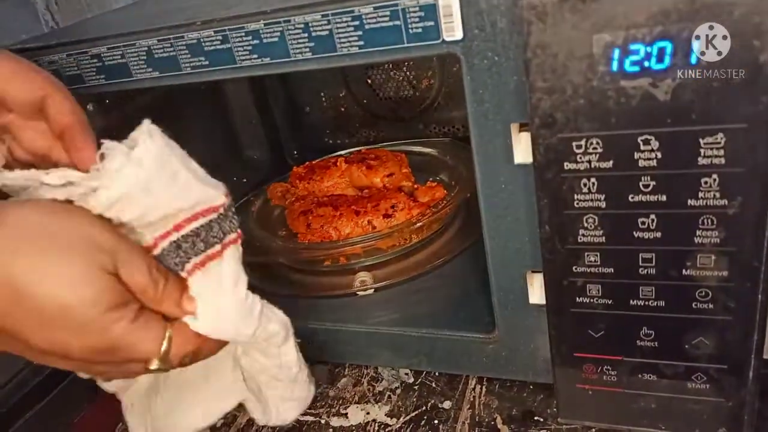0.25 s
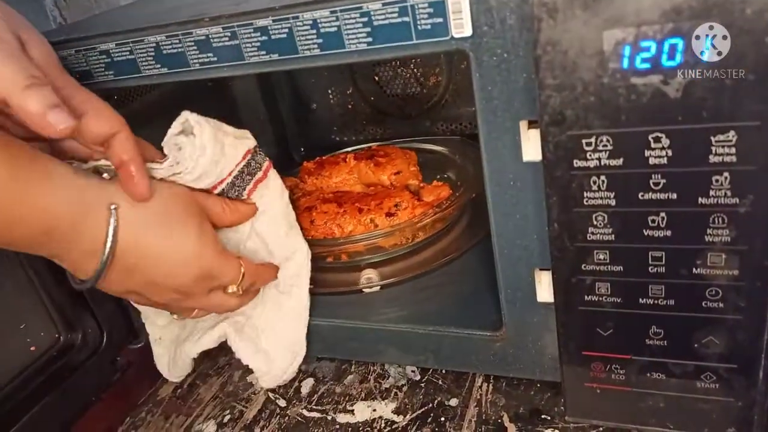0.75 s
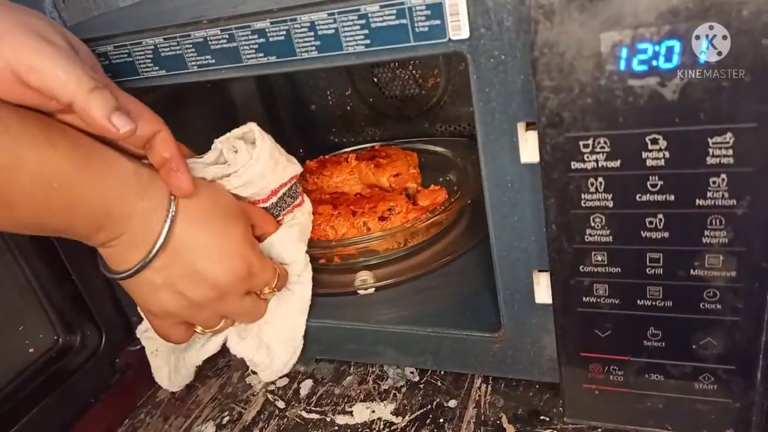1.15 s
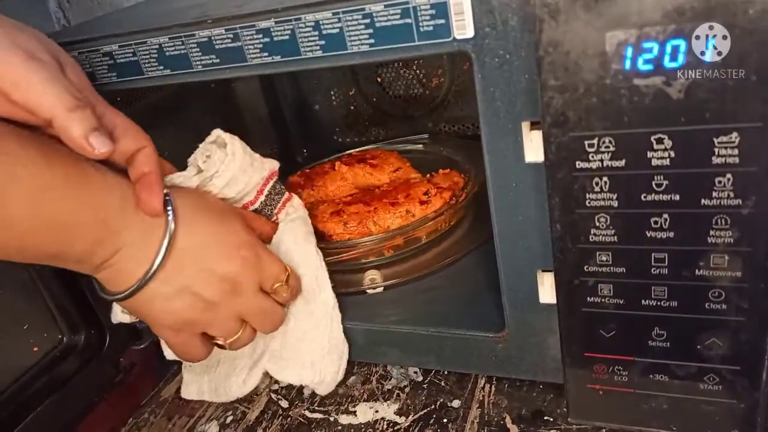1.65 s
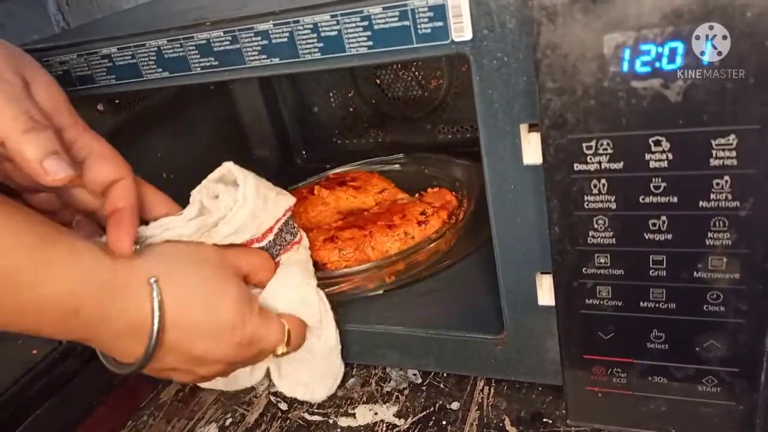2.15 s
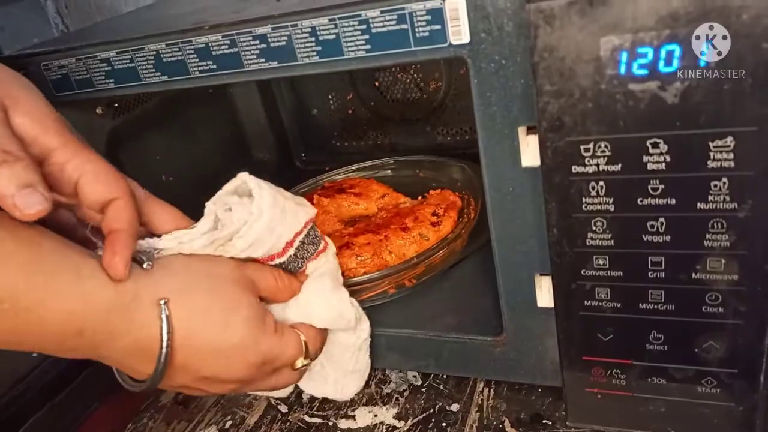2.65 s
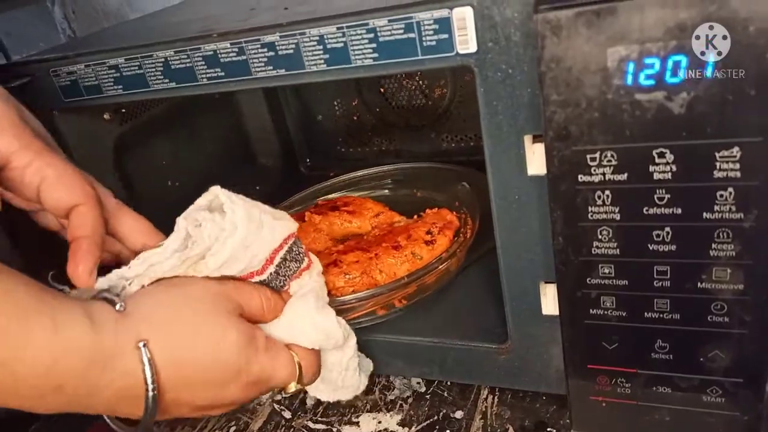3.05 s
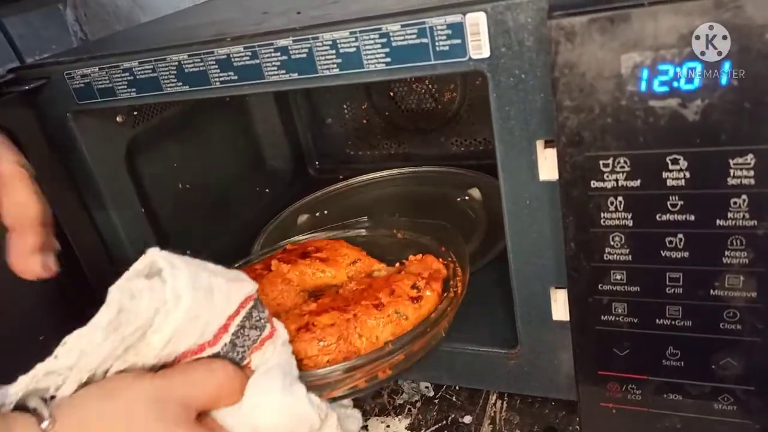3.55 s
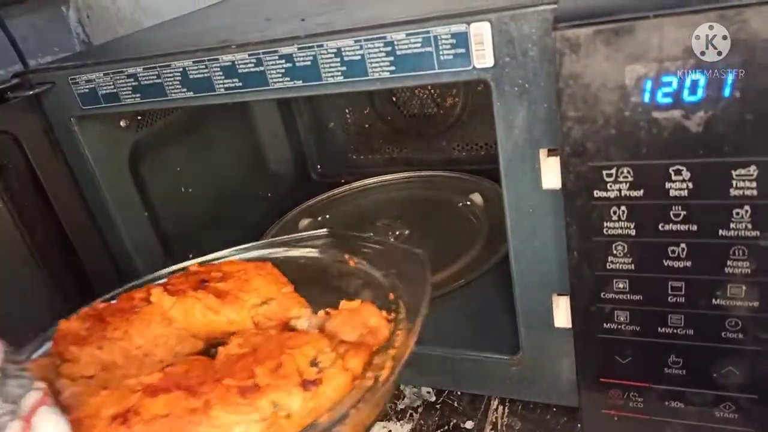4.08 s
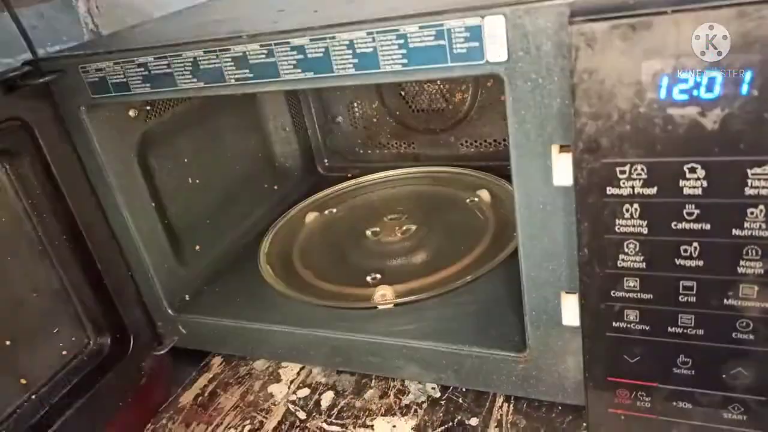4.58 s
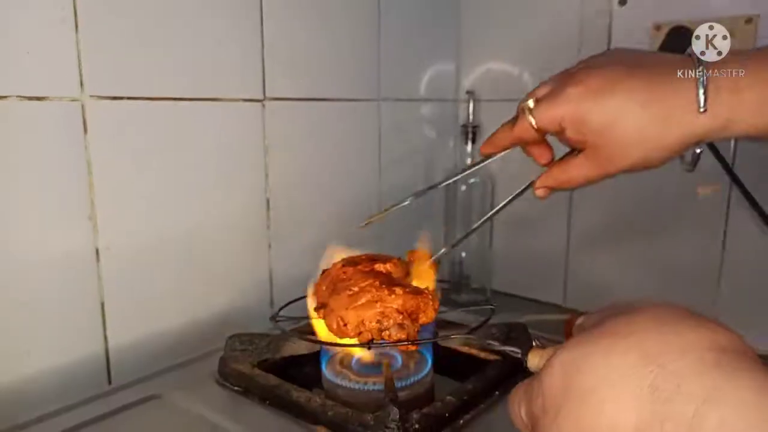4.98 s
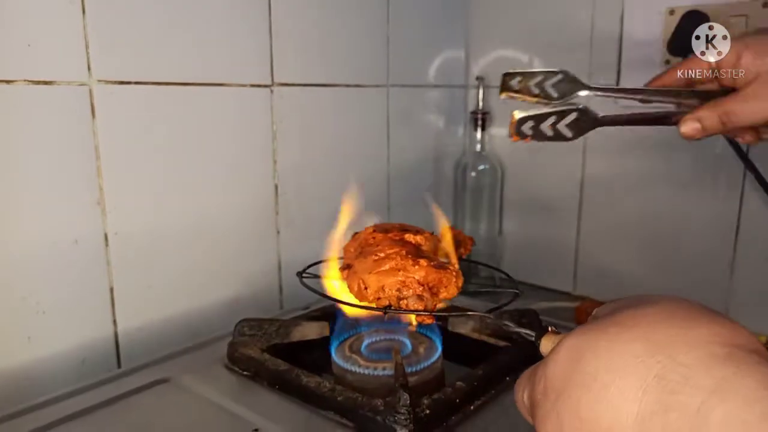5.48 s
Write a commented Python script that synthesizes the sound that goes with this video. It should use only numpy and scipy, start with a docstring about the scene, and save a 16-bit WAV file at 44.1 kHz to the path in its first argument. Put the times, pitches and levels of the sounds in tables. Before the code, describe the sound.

Over a low kitchen hum, a brief squeak and soft towel rubbing lead into dull knocks as a glass dish is worked out of a microwave oven. It drags with a rough ringing tone, clinks hard once, then taps lightly over the turntable. After a tiny squeak the sound fades, and a gas flame comes in, roaring softly while meat sizzles and spits. Everything is close, in stereo.

```python
"""A squeak over the hum of a small kitchen: close by, a glass baking dish is being worked out of a
microwave oven with a towel. It rubs, knocks in the steel cavity, drags until the glass sings, clinks
hard once and taps over the turntable. After a last short squeak the oven fades out, and we fade in at a
gas burner, where the flame roars and meat sizzles and spits. One stereo microphone hears it all."""
import sys
import numpy as np
from scipy import signal
from scipy.fft import rfft, irfft
from scipy.io import wavfile

SR = 44100
rng = np.random.default_rng(int(sys.argv[2]) if len(sys.argv) > 2 else 0)


def store_pcm(level_fs):
    """Save levels as 16-bit WAV."""
    pcm = np.round(np.clip(level_fs, -1, 1) * 32767).astype(np.int16)
    wavfile.write(sys.argv[1], SR, np.atleast_2d(pcm).T)


N = 252296
TIME = np.arange(N) / SR
RING = np.arange(SR // 2) / SR  # seconds since a blow

# Modes of the glass dish and of the steel cavity. Each row: frequency in Hz, level in dB, t60 in seconds.
DISH_MODES = [(792, -1.5, 0.19), (1040, -2.5, 0.2), (1145, 2.5, 0.1), (1735, -1, 0.2), (1787, 9, 0.053),
              (2220, -9, 0.19), (2617, -4.5, 0.1), (3540, -5.5, 0.096), (4100, -8.5, 0.085),
              (4700, -8.5, 0.12), (6300, -9.5, 0.15)]
OVEN_MODES = [(219, -8, 0.31), (253.6, 0.5, 0.23), (333, -13.5, 0.42), (487, -6, 0.24), (568, 2.5, 0.13),
              (621.5, 5, 0.14)]
# Colours of a soft blow and of sizzling fat. Each row: frequency in Hz, relative density in dB.
SOFT_BLOW_SPECTRUM = [(80, -19.5), (240, 1), (650, 2), (1300, -1.5), (2050, -4), (2900, -19), (4500, -17.5),
                      (5500, -27.5), (6600, -19), (8300, -29), (15000, -42.5)]
SIZZLE_SPECTRUM = [(700, 4), (2700, 2), (3200, 5), (4200, 5), (5000, -3), (5950, -3), (6250, 3.5),
                   (8400, 3.5), (12000, -4.5), (15500, 0)]
# The hard clink and its rebounds. Each row: start in seconds, level in dB.
CLINK_HITS = [(2.2734, -19), (2.2778, -14), (2.284, -23), (2.292, -28), (2.3032, -33.5)]


def amp(db):
    """Decibels to gain."""
    return 10 ** (np.asarray(db) / 20)


def ramp(x):
    """Holds a slope between 0 and 1."""
    return np.clip(x, 0, 1)


def unit_rms(x):
    """Scales to rms 1."""
    return x / np.sqrt(np.mean(x ** 2) + 1e-20)


def unit_attack(x):
    """Scales a blow so that its first 30 ms have rms 1."""
    return x / np.sqrt(np.mean(x[:, :round(0.03 * SR)] ** 2) + 1e-20)


def curve_at(points, hz):
    """Interpolates a curve over log frequency."""
    point_hz, values = np.transpose(points)
    return np.interp(np.log(hz + 1), np.log(point_hz + 1), values)


def add(mix, start_s, sound):
    """Mixes a sound in at its start time."""
    part = mix[:, round(start_s * SR):][:, :sound.shape[1]]
    part += sound[:, :part.shape[1]]


def panned(x, left_db):
    """Sets the left channel left_db above the right."""
    return x * amp([[left_db / 2], [-left_db / 2]])


def band(x, lo_hz, hi_hz):
    """Causal band-pass."""
    sos = signal.butter(3, [lo_hz, min(hi_hz, SR / 2 - 1)], "band", fs=SR, output="sos")
    return signal.sosfilt(sos, x)


def band_noise(lo_hz, hi_hz, shape=N):
    """Noise in one band, at rms 1."""
    return unit_rms(band(rng.standard_normal(shape), lo_hz, hi_hz))


def coloured(x, spectrum):
    """Colours two unrelated signals; the microphone's two ports hear the bass alike."""
    # Each row: frequency in Hz, left-right correlation.
    port_likeness = [(250, 0.9), (500, 0.6), (1000, 0.13), (2000, 0)]
    hz = np.fft.rfftfreq(x.shape[1], 1 / SR)
    correlation = curve_at(port_likeness, hz)
    mid, side = rfft(x) * np.sqrt([1 + correlation, 1 - correlation])
    left_right = np.array([mid + side, mid - side]) * amp(curve_at(spectrum, hz))
    return unit_rms(irfft(left_right, x.shape[1]))


def noise(spectrum, size=N):
    """Stereo noise of a given colour."""
    return coloured(rng.standard_normal((2, size)), spectrum)


def grains(spectrum, per_s, spread_db):
    """Coloured random clicks of uneven size, each heard at both ports."""
    sizes = amp(spread_db * np.minimum(rng.exponential(1, N), 4))
    fires = rng.random(N) < per_s / SR
    return coloured(sizes * fires * rng.standard_normal((2, N)), spectrum)


def ringing(modes, apart_hz=1300, place_db=2.2):
    """Dying modes, weighted by where the blow lands; high ones differ more in phase between the ports."""
    out = np.zeros((2, len(RING)))
    for hz, db, t60 in modes:
        port_phase = np.array([[1], [-1]]) * min(hz / apart_hz, 1) * np.pi / 4
        phase = 2 * np.pi * rng.random() + rng.choice([-1, 1]) * port_phase
        decay = amp(db + place_db * rng.standard_normal() - 60 * RING / t60)
        out += ramp(RING * hz) * decay * np.sin(2 * np.pi * hz * RING + phase)
    return unit_attack(out)


def eased_in(blow, rise_s):
    """Rounds off the onset of a blow."""
    return blow * (1 - np.exp(-RING / rise_s))


def clatter(spectrum, t60, contact_s=0.00036):
    """Countless short overtones merging into a noisy crack."""
    onset = 1 - np.exp(-(RING / contact_s) ** 2)
    return unit_attack(noise(spectrum, len(RING)) * amp(-60 * RING / t60) * onset)


def contact(blow, thud_db, ring_db, tick_db):
    """Place and hardness of a contact set its thud (centre), ring (to the right) and tick (to the left)."""
    parts = [(thud_db, 130, 700, 0), (ring_db, 700, 2800, -4), (tick_db, 2800, 15000, 2)]
    return sum(amp(db) * unit_attack(panned(band(blow, lo_hz, hi_hz), left_db))
               for db, lo_hz, hi_hz, left_db in parts)


def kitchen(tone_db=-44.5, hum_hz=98, hum_db=-55, hiss_db=-60):
    """Room tone, a low appliance hum and the microphone's faintly wavering hiss."""
    # Each row of both: frequency in Hz, relative density in dB.
    tone_spectrum = [(25, -43.5), (64, -15), (85, -10), (132, -3), (401, -6.5), (1270, -17), (4550, -29),
                     (5370, -37.5), (6640, -31.5), (8400, -36.5), (10900, -61), (18500, -120)]
    hiss_spectrum = [(5800, -13.5), (6550, 5), (7100, -7), (7700, -2), (8600, -10.5), (15500, -14)]
    hum = amp(hum_db) * band_noise(hum_hz - 5, hum_hz + 5)
    waver_db = 0.7 * band_noise(0.6, 5)
    return amp(tone_db) * noise(tone_spectrum) + hum + amp(hiss_db + waver_db) * noise(hiss_spectrum)


def stick_slip(strokes, harmonics_db, edge_s, waver, waver_hz, hiss_db, sag=0, arch=0):
    """Regular stick and slip: hiss and fluttering harmonics whose pitch sags or arches over a stroke."""
    out = np.zeros((2, N))
    port_cycles = np.array([[0], [0.1]])
    wobble, *flutter_db = band_noise(waver_hz / 4, waver_hz, (len(harmonics_db) + 1, N))
    hiss = amp(hiss_db) * noise(SIZZLE_SPECTRUM)
    for start_s, length_s, hz, db in strokes:
        along = ramp((TIME - start_s) / length_s)
        pitch_hz = hz * (1 - sag * along + arch * np.sin(np.pi * along) + waver * wobble)
        phase = 2 * np.pi * (np.cumsum(pitch_hz) / SR + port_cycles)
        tone = sum(amp(harmonic_db + flutter_db[k - 1]) * np.sin(k * phase)
                   for k, harmonic_db in enumerate(harmonics_db, 1))
        gate = ramp(np.minimum(along, 1 - along) * length_s / edge_s)
        out += amp(db) * gate * (unit_rms(tone) + hiss)
    return out


def long_squeak():
    """Something catches twice and squeaks, sagging a little in pitch."""
    # Each row: start in seconds, length in seconds, pitch in Hz, level in dB.
    strokes = [(0, 0.12, 1173, -38), (.129, 0.075, 1160, -39)]
    # Level of each harmonic in dB, fundamental first.
    harmonics_db = [1, 0, -6.5, -12, -20, -20]
    return stick_slip(strokes, harmonics_db, edge_s=0.0017, waver=0.007, waver_hz=35,
                      hiss_db=-31, sag=0.0157)


def scrapes(attack_s=0.014, release_s=0.088):
    """Fine, gritty rubbing as the towel and the dish slide."""
    # Each row: start in seconds, seconds until the release, level in dB.
    rubs = [(0.203, 0.067, -38), (0.902, 0.029, -37), (3.041, 0.038, -44)]
    # Each row: frequency in Hz, relative density in dB.
    rub_spectrum = [(150, 0), (280, 5), (1500, -1), (2150, 4.5), (2700, -12), (6600, -19), (9000, -39)]
    level = sum(amp(db) * ramp((TIME - s) / attack_s) * ramp(1 - (TIME - s - held_s) / release_s) ** 2
                for s, held_s, db in rubs)
    return level * panned(grains(rub_spectrum, per_s=2500, spread_db=1), left_db=-0.5)


def oven_boom(rise_s):
    """The steel cavity takes a moment to build up its boom."""
    return unit_attack(eased_in(ringing(OVEN_MODES), rise_s))


def taps(notes_db=1, clatter_db=-3, boom_db=-14, note_cycles=114, longest_s=0.075):
    """Glass on glass: the turntable rings, with two short notes that depend on where it is touched."""
    # Each row: start in seconds, thud, ring and tick in dB, main and second note in Hz.
    hits = [(0.9082, -42, -35, -45.5, 1780, 2120), (3.02, -47, -41, -55, 2050, 1590),
            (3.074, -46, -37.5, -64, 1884, 3750), (3.096, -41, -37.5, -60, 1960, 1416),
            (3.198, -37, -38, -55, 1730, 1284), (3.231, -43, -40.5, -63, 1420, 1950),
            (3.2464, -45, -32, -56, 1827, 3700), (3.303, -40.5, -27, -47.5, 1983, 1216),
            (3.4702, -35.5, -22.5, -38, 875, 1788)]
    # Each row: frequency in Hz, level in dB, t60 in seconds.
    turntable_modes = [(878, -6.5, 0.19), (1170, 9, 0.034), (1766, 8, 0.062), (1990, 2, 0.058),
                       (3120, -9.5, 0.11), (3344, -12.5, 0.099)]
    out = np.zeros((2, N))
    for start_s, thud_db, ring_db, tick_db, *notes_hz in hits:
        notes = ringing([(hz, 0, min(note_cycles / hz, longest_s)) for hz in notes_hz])
        glass = ringing(turntable_modes) + amp(notes_db) * notes
        crack = amp(clatter_db) * clatter(SOFT_BLOW_SPECTRUM, t60=0.12)
        blow = glass + crack + amp(boom_db) * oven_boom(rise_s=0.086)
        add(out, start_s, contact(blow, thud_db, ring_db, tick_db))
    return out


def knocks(glass_db=-8, note_db=-3, thump_db=-5, thump_hz=260, towel_db_per_s=498.5):
    """The towel-damped dish thumps the oven floor; each contact has its own short note."""
    # Each row: start in seconds, thud, ring and tick in dB, rise in seconds, note in Hz.
    hits = [(1.161, -33.5, -36, -48.5, 0.004, 571), (1.452, -45, -37.5, -57, 0.014, 792),
            (1.471, -41.5, -34, -42.5, 0.0028, 1803), (1.484, -61, -49, -47, 0.00081, 3310),
            (1.512, -37, -56, -59, 0.0032, 835), (1.759, -42.5, -44.5, -68, 0.003, 792),
            (1.805, -37.5, -54, -71, 0.0022, 266), (1.828, -38, -58.5, -74, .008, 245.7),
            (1.949, -32.5, -39, -68.5, 0.0035, 207), (2.004, -36.5, -50, -58.5, 0.0019, 238),
            (2.024, -38.5, -56, -68, 0.0023, 223), (2.236, -32.5, -31.5, -40, 0.006, 1670),
            (2.329, -31.5, -46, -56, 0.0046, 251)]
    note_cycles, longest_s = 180, 0.16  # high notes die soonest, as dry clacks
    out = np.zeros((2, N))
    for start_s, thud_db, ring_db, tick_db, rise_s, note_hz in hits:
        glass = unit_attack(ringing(DISH_MODES) * amp(-towel_db_per_s * RING))
        floor_hz = thump_hz * amp(0.5 * rng.standard_normal())
        thump = unit_attack(eased_in(ringing([(floor_hz, 0, 0.11)]), rise_s=0.008))
        note = ringing([(note_hz, 0, min(note_cycles / note_hz, longest_s))])
        crack = clatter(SOFT_BLOW_SPECTRUM, t60=0.083)
        blow = crack + amp(glass_db) * glass + amp(note_db) * note + amp(thump_db) * thump
        add(out, start_s, contact(eased_in(blow, rise_s), thud_db, ring_db, tick_db))
    return out


def drag(cavity_db=-4, depth_db=22.5):
    """With each shove, tiny slips under the dish rumble in the cavity and grate to the right."""
    # Each row: peak time, build-up and easing in seconds (each spans depth_db), rumble and grit in dB.
    shoves = [(1.5, 0.27, 0.19, -39.5, -53), (1.835, 0.03, 0.52, -43, -55), (2.265, 0.18, 0.29, -34, -36.5),
              (2.6, 0.28, 0.3, -40.5, -56.5), (3.07, 0.34, 0.18, -44.5, -44), (3.26, 0.4, 0.42, -46, -52)]
    power = np.zeros((2, N))
    for peak_s, build_s, ease_s, rumble_db, grit_db in shoves:
        from_peak = np.maximum((peak_s - TIME) / build_s, (TIME - peak_s) / ease_s)
        power += amp(np.array([[rumble_db], [grit_db]]) - depth_db * from_peak) ** 2
    rumble_gain, grit_gain = np.sqrt(power)
    slips = grains(SOFT_BLOW_SPECTRUM, per_s=1300, spread_db=0.5)
    cavity = unit_rms(signal.fftconvolve(slips, ringing(OVEN_MODES)[:1], axes=1)[:, :N])
    rumble = unit_rms(unit_rms(band(slips, 190, 900)) + amp(cavity_db) * cavity)
    grit = panned(unit_rms(band(slips, 860, 4600)), left_db=-5)
    return rumble_gain * rumble + grit_gain * grit


def singing_glass(peak_db=-34, swell_db_per_s=68, lead_s=0.15, edge_s=0.05):
    """The dragged glass sings in rough, gliding tones that swell with the pull and stop as it drops."""
    # Each row: final pitch in Hz, glide in Hz per second, half width in Hz, level in dB.
    voices = [(625, -450, 30, -0.5), (1160, 250, 50, -4.5), (2530, -200, 68, -17.5)]
    to_clink_s = CLINK_HITS[0][0] - TIME
    gate = ramp((lead_s - to_clink_s) / edge_s) * ramp(1 + to_clink_s / edge_s)
    tones = np.zeros(N)
    for final_hz, glide, half_width_hz, db in voices:
        phase = 2 * np.pi * np.cumsum(final_hz - glide * np.clip(to_clink_s, 0, lead_s)) / SR
        slips = band_noise(0.84, half_width_hz, (2, N))
        tones += amp(db) * (slips[0] * np.cos(phase) + slips[1] * np.sin(phase))
    return gate * amp(peak_db - swell_db_per_s * np.maximum(to_clink_s, 0)) * unit_rms(tones)


def clink(glass_db=-18.5, boom_db=-24.5, lowest_hz=160):
    """The dish drops against the turntable's rim and rebounds; its glass rings on and the oven booms."""
    # Each row: frequency in Hz, relative density in dB.
    hard_blow_spectrum = [(250, -24), (550, 6.5), (850, -1), (1450, -1.5), (1830, 13), (2150, -2.5),
                          (2600, 4.5), (3050, -10.5), (3500, 2), (5000, -10.5), (5850, -13), (6250, 0.5),
                          (7200, -10.5), (8350, -3), (9000, -28), (15500, -37.5)]
    out = np.zeros((2, N))
    for start_s, db in CLINK_HITS:
        add(out, start_s, amp(db) * clatter(hard_blow_spectrum, t60=0.048))
    glass = unit_attack(eased_in(ringing(DISH_MODES), rise_s=0.0032))
    add(out, CLINK_HITS[0][0], amp(glass_db) * glass)
    add(out, CLINK_HITS[1][0], amp(boom_db) * oven_boom(rise_s=0.026))
    return band(out, lowest_hz, SR / 2)


def short_squeak():
    """One brief, hissy squeak that arches in pitch, just right of centre."""
    # The row: start in seconds, length in seconds, pitch in Hz, level in dB.
    strokes = [(4.658, 0.034, 1737, -34)]
    # Level of each harmonic in dB, fundamental first.
    harmonics_db = [3, -3, -13, -3]
    squeak = stick_slip(strokes, harmonics_db, edge_s=0.011, waver=0.018, waver_hz=302,
                        hiss_db=-12, arch=0.03)
    return panned(squeak, left_db=-2)


def burner(roar_db=-44, drone_hz=117, drone_db=-55, sizzle_db=-43):
    """A gas flame roars and drones, and fat sizzles in clusters; the flame flares once at the meat."""
    # Each row: frequency in Hz, relative density in dB.
    flame_spectrum = [(30, -62), (73, -9), (107, -3.5), (148, -8), (321, -6), (404, -13.5), (926, -14),
                      (3900, -51), (6600, -120)]
    flare_s, rise_s, fall_s = 5.28, 0.19, 0.045
    drone_lift_db, sizzle_lift_db = 13.64, 4.18
    flare = np.exp(-((TIME - flare_s) / np.where(TIME < flare_s, rise_s, fall_s)) ** 2)
    roar = amp(roar_db) * noise(flame_spectrum)
    drone = amp(drone_db + drone_lift_db * flare) * unit_rms(np.sin(2 * np.pi * drone_hz * TIME))
    clusters_db = 0.57 * band_noise(7.9, 90)
    sizzle = grains(SIZZLE_SPECTRUM, per_s=6000, spread_db=0)
    return roar + drone + amp(sizzle_db + sizzle_lift_db * flare + clusters_db) * sizzle


def spitting_fat(pop_db=1, fizz_db=-7):
    """Bubbles of fat pop and fizz away."""
    # Each row: start in seconds, level in dB.
    spits = [(5.0405, -43.5), (5.0657, -41), (5.1686, -39.5), (5.1944, -41.5), (5.2779, -46),
             (5.304, -40.5)]
    out = np.zeros((2, N))
    for start_s, db in spits:
        pop = amp(pop_db) * clatter(SIZZLE_SPECTRUM, t60=0.041)
        fizz = amp(fizz_db) * clatter(SIZZLE_SPECTRUM, t60=0.22)
        add(out, start_s, amp(db) * band(pop + fizz, 520, 13000))
    return out


def room(x, onset_s=0.021):
    """The diffuse tail off the kitchen tiles; the bass lingers longest."""
    # Each row: frequency in Hz, t60 in seconds.
    decay_times = [(100, 0.6), (2000, 0.26), (15000, 0.26)]
    white = noise([(20, 0), (20000, 0)], len(RING))
    hz, seconds, frames = signal.stft(white, SR, nperseg=256)
    frames *= amp(-60 * seconds / curve_at(decay_times, hz)[:, None])
    tail = signal.istft(frames, SR, nperseg=256)[1][:, :len(RING)]
    tail *= 1 - np.exp(-(RING / onset_s) ** 2)
    return signal.fftconvolve(x, tail / np.linalg.norm(tail[0]), axes=1)[:, :N]


def scene(dish_send_db=-11, squeak_send_db=-8):
    """Two positions: at the oven, then, after a moment's silence, at the burner."""
    oven_end_s, fade_out_s = 4.821, 0.13
    burner_start_s, fade_in_s = 4.91, 0.12
    dish = knocks() + taps() + clink() + drag() + singing_glass() + scrapes()
    squeaks = long_squeak() + short_squeak()
    reverb = room(amp(dish_send_db) * dish + amp(squeak_send_db) * squeaks)
    at_oven = dish + squeaks + reverb + kitchen()
    at_burner = burner() + spitting_fat()
    fade_out = np.sqrt(ramp((oven_end_s - TIME) / fade_out_s))
    fade_in = ramp((TIME - burner_start_s) / fade_in_s) ** 2.46
    return at_oven * fade_out + at_burner * fade_in


def record(dry):
    """The microphone's soft overload, bass roll-off and treble notch, then the band limit."""
    # The notch. Each row: frequency in Hz, gain in dB.
    response = [(8450, -3), (8750, -15), (10700, -16.5), (11250, -58), (11600, -2.5)]
    ceiling, low_cut_hz, top_hz = 1.1, 40, 15550
    saturated = ceiling * np.tanh(dry / ceiling)
    thinned = signal.sosfilt(signal.butter(2, low_cut_hz, "high", fs=SR, output="sos"), saturated)
    hz = np.linspace(0, SR / 2, 1025)
    notch = signal.firwin2(1023, hz, amp(curve_at(response, hz)), fs=SR)
    band_limit = signal.firwin(511, top_hz, window=("kaiser", 9), fs=SR)
    return signal.oaconvolve(thinned, np.convolve(notch, band_limit)[None], "same", axes=1)


dry = scene()
out = record(dry)
store_pcm(out)
```